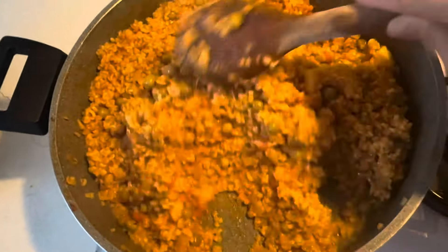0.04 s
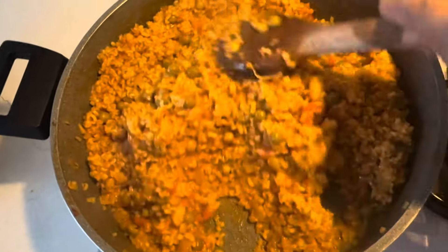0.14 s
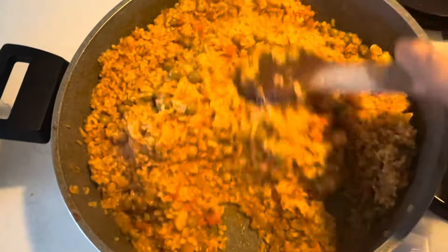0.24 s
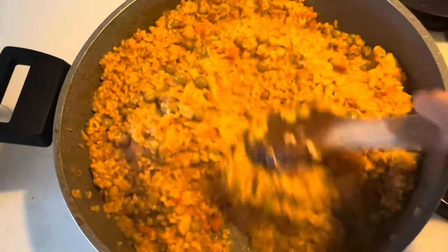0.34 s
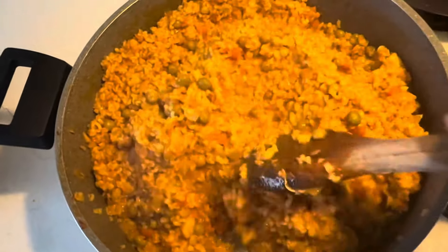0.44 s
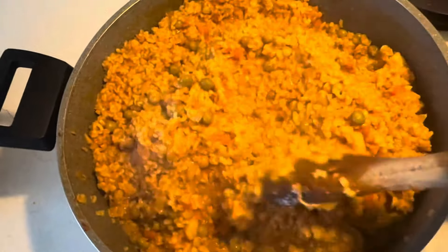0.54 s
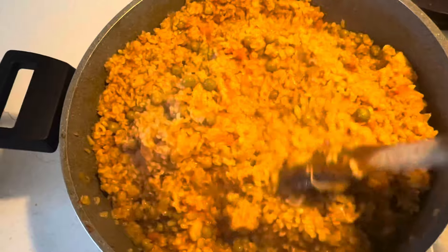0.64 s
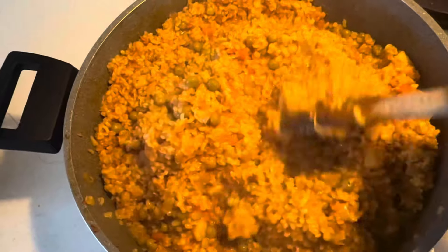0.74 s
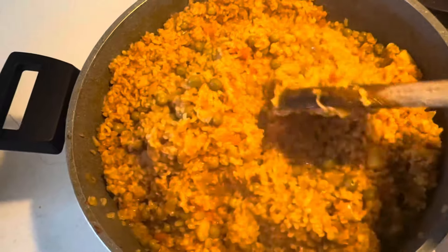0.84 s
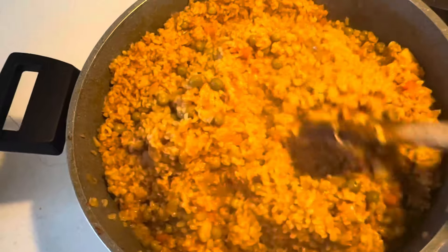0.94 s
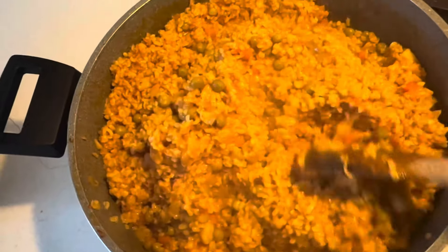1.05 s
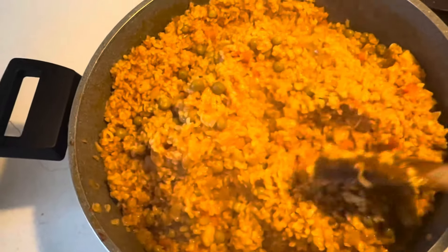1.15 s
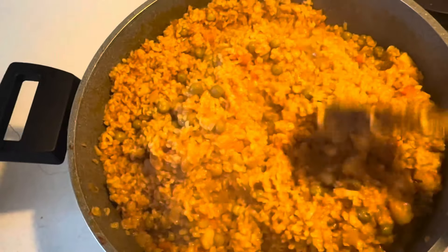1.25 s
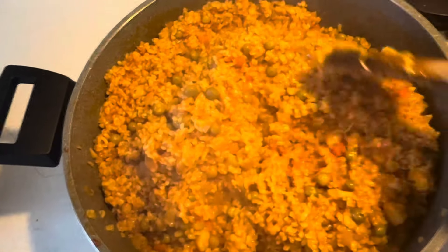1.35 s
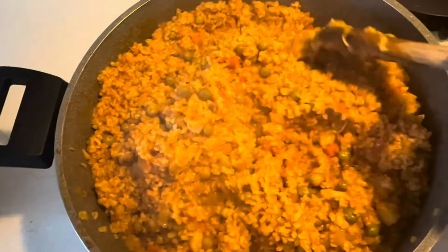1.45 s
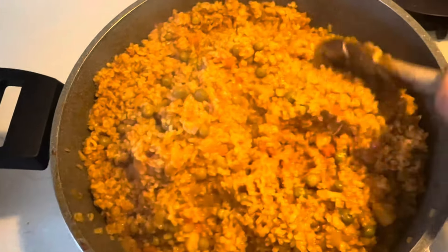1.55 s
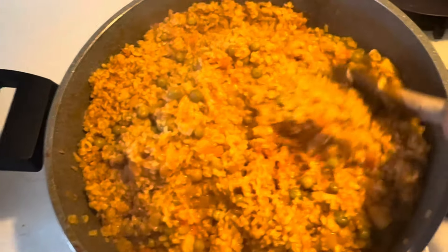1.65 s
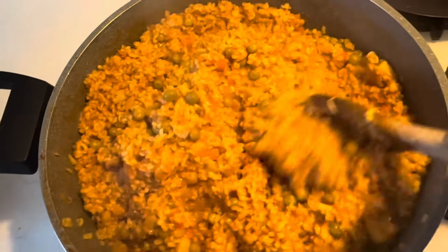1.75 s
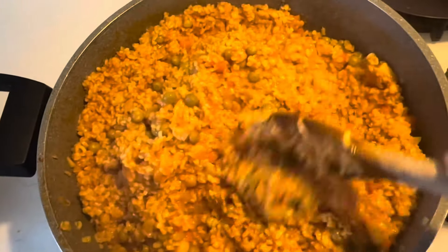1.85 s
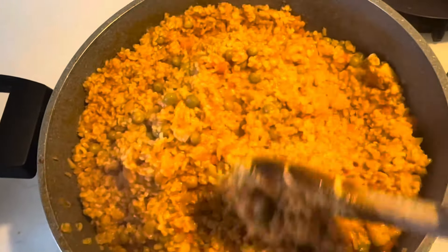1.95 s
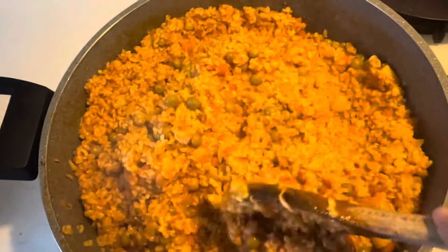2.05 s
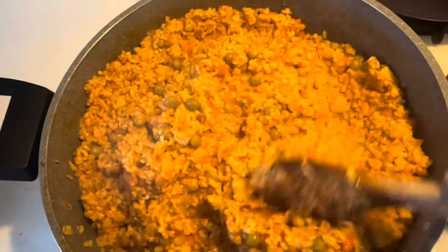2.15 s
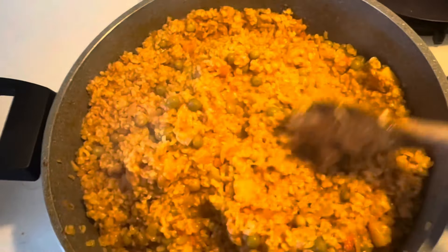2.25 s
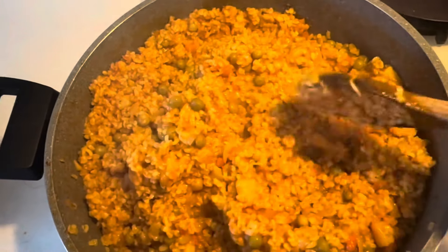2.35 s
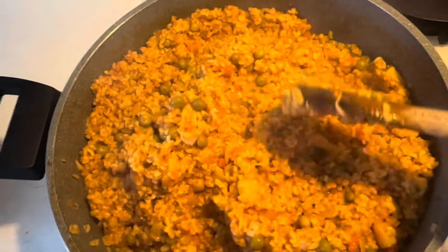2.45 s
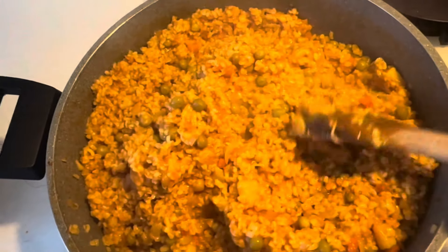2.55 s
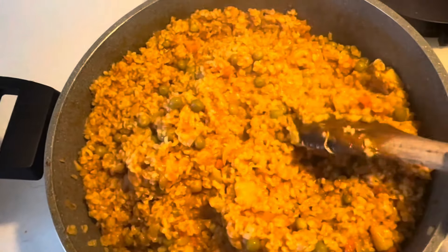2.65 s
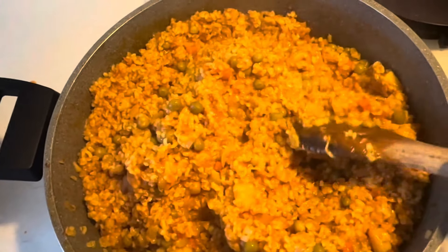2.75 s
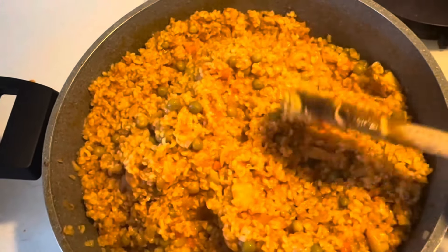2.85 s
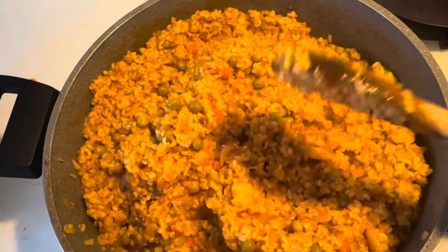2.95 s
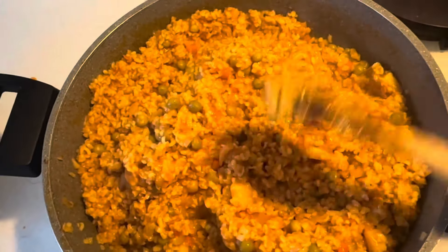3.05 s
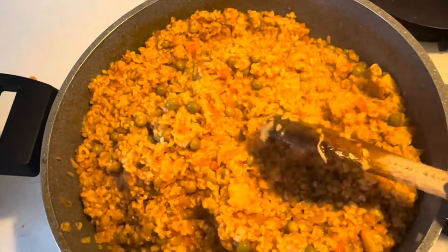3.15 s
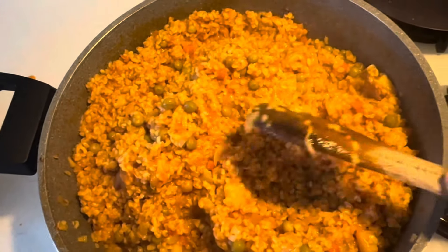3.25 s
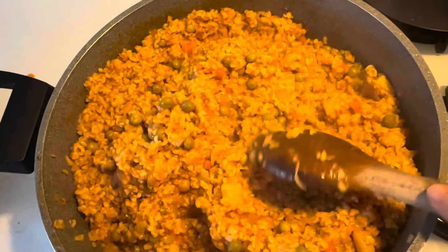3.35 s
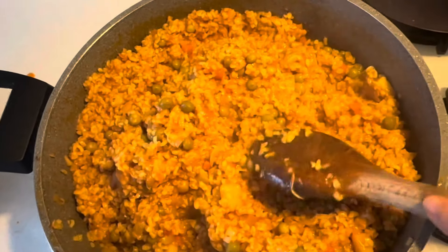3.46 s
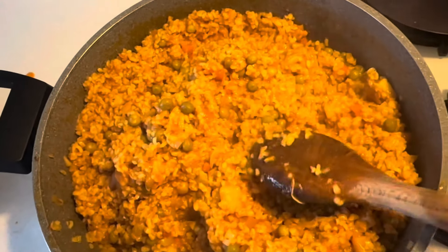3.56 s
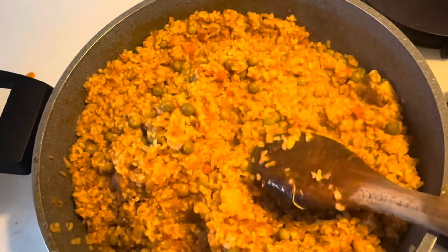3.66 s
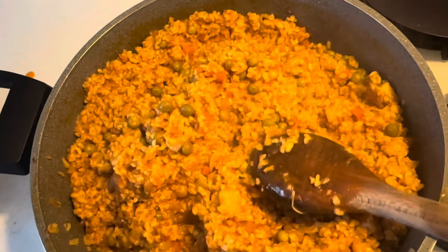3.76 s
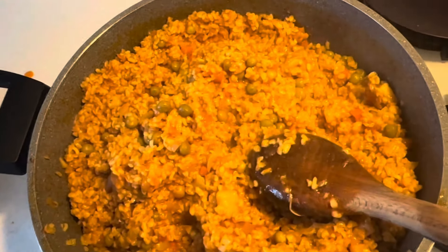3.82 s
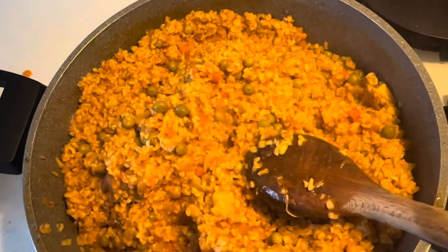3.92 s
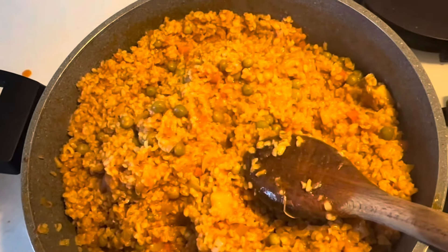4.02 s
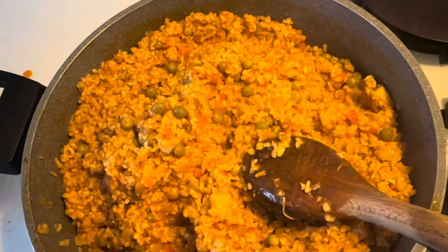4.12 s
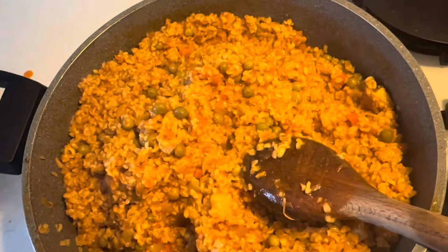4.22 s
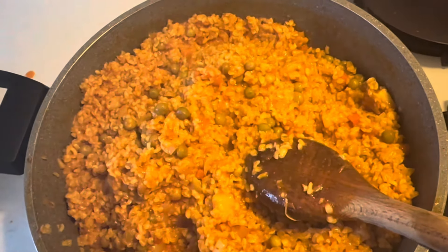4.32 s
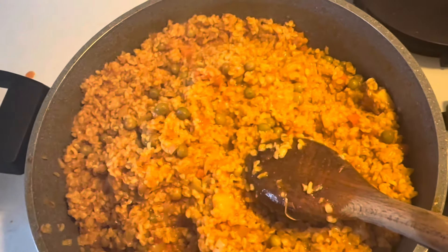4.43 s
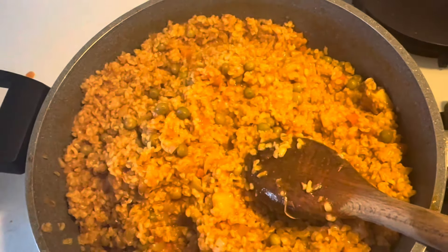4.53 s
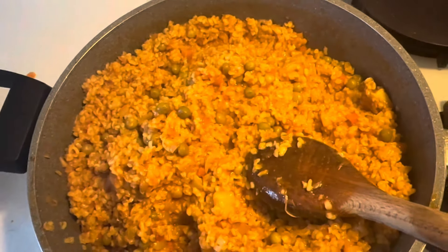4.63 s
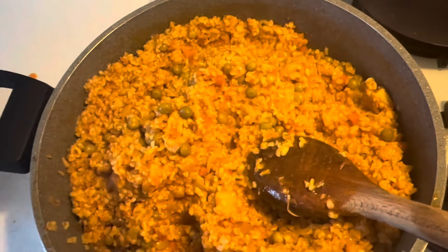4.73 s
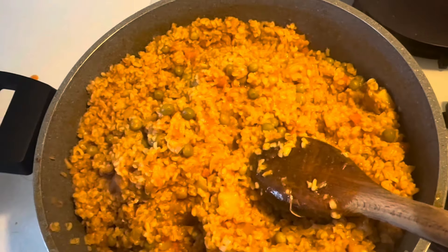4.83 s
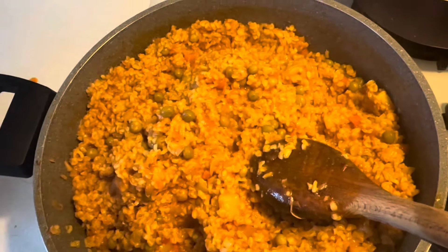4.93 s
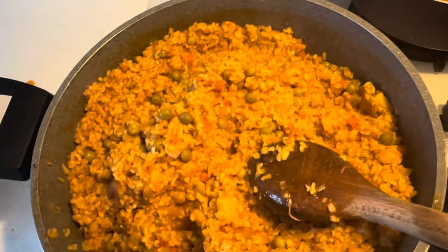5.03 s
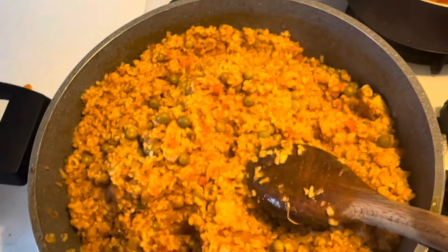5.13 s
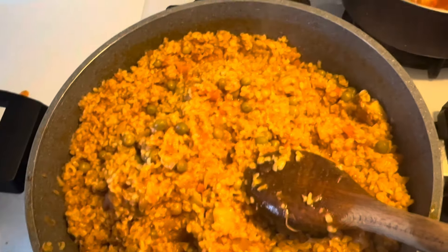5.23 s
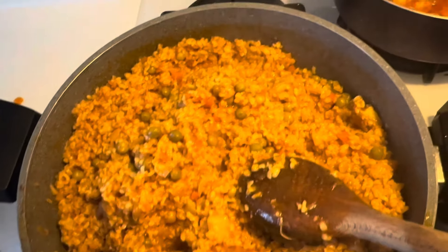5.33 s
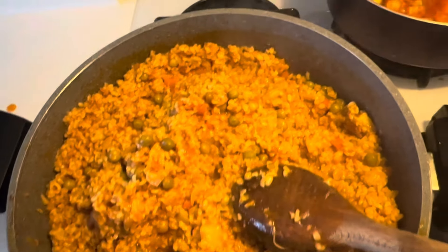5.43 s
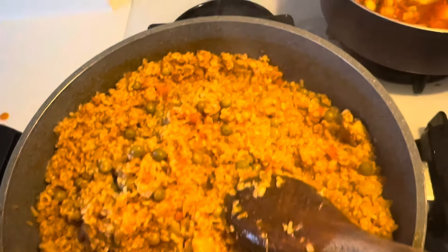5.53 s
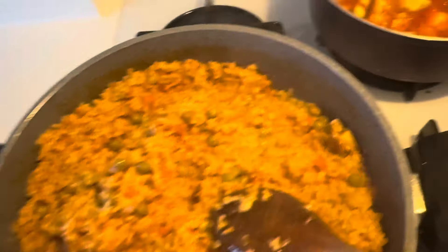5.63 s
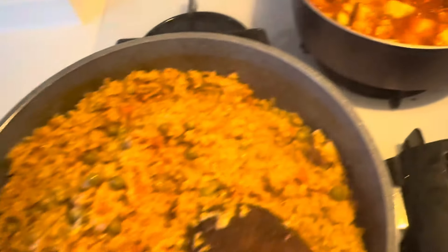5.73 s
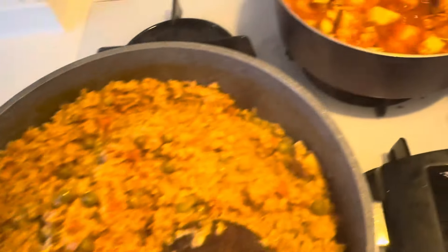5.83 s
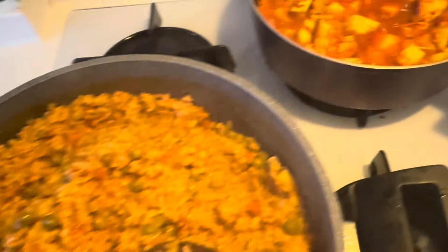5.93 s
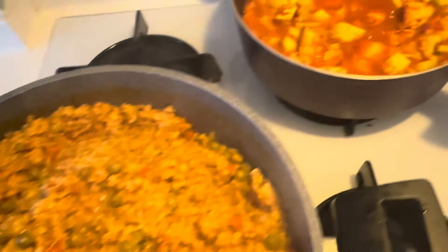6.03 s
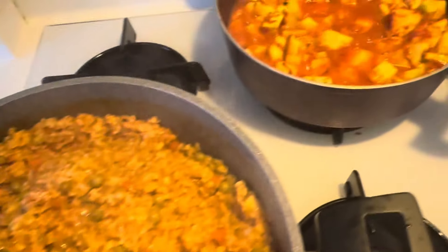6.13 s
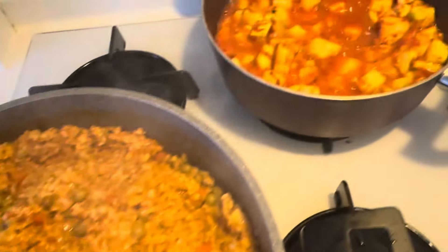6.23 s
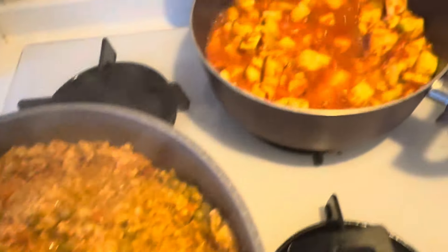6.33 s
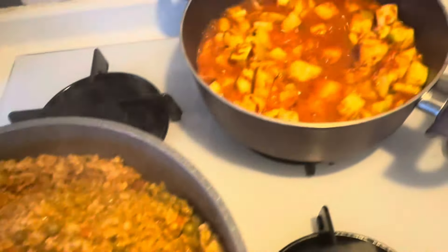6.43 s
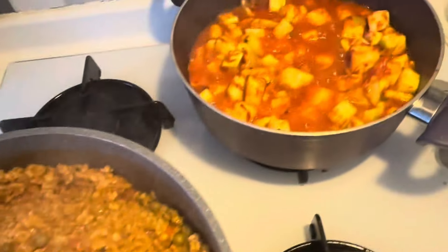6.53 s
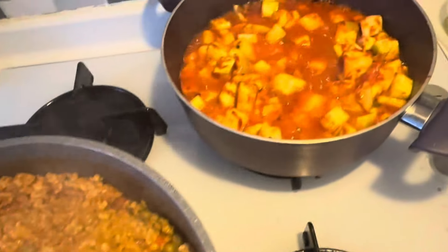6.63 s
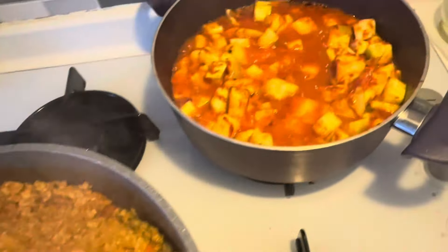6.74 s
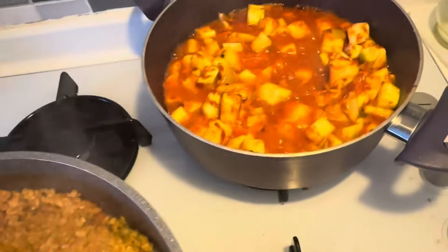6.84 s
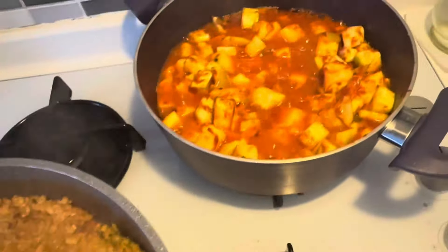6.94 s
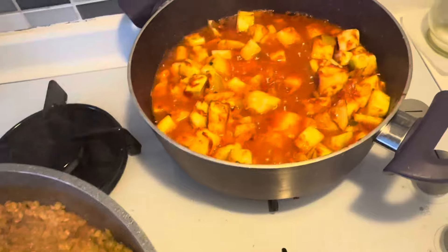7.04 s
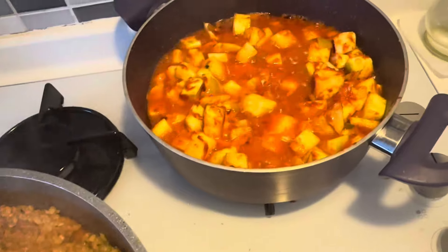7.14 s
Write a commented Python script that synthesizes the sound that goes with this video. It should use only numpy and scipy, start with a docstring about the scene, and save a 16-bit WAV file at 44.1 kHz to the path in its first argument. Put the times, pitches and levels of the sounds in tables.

```python
"""Gas burners rumble and rice sizzles faintly while a wooden spoon softly turns it; stew bubbles in a pot beside it.
The spoon bumps the pan, raps once hard on its rim and is laid down; the pan thuds and chatters on its grate.
Shaped noise makes flames, seething and scraping; decaying sines make bubbles, crackle and struck modes.
The steady sources grow louder, the stew's pips most, as the microphone moves from the rice to the pot."""
import sys
import numpy as np
from scipy import signal
from scipy.fft import rfft, irfft, next_fast_len
from scipy.io import wavfile
from scipy.ndimage import map_coordinates

SR = 44100
rng = np.random.default_rng(int(sys.argv[2]) if len(sys.argv) > 2 else 0)


def transcribe(u):
    """Save the signal u as a 16-bit wav file named by the first command-line argument.

    u: samples, shape (n,) or (channels, n), limited to [-1, 1]; the rate is SR.
    q: integer samples, one column per channel.
    """
    v = np.clip(np.atleast_2d(u).T, -1, 1)
    q = np.round(v * 32767).astype(np.int16)
    wavfile.write(sys.argv[1], SR, q)


N = 316638  # length [samples]


def amp(db):
    """Decibels to amplitude gain, 20 dB for each factor of ten."""
    return 10 ** (np.asarray(db) / 20)


def unit(x):
    """Normalise the mean power, so that the rms is 1."""
    return x / np.sqrt(np.mean(x ** 2) + 1e-20)


def along(points, hz):
    """Interpolate (frequency [Hz], value) points on a logarithmic frequency axis."""
    f, v = np.transpose(points)
    return np.interp(np.log(hz + 1), np.log(f + 1), v)


def wobble(rate):
    """Slow random modulation: a smooth curve through rate random knots a second."""
    knots = rng.standard_normal(int(N * rate / SR) + 4)
    return map_coordinates(knots, [np.arange(N) * rate / SR])


def swell(s, half):
    """A Gaussian envelope: a smooth rise and fall around time s [s]."""
    return np.exp(-((np.arange(N) / SR - s) / half) ** 2)


def add(track, s, sound):
    """Superposition: mix a sound into a track at time s [s]."""
    start = round(s * SR)
    part = sound[..., :track.shape[-1] - start]
    track[..., start:start + part.shape[-1]] += part


def filtered(x, response):
    """Linear filtering: multiply the spectrum by a complex response of frequency."""
    n = x.shape[-1]
    m = next_fast_len(n + SR // 4)
    return irfft(rfft(x, m) * response(np.fft.rfftfreq(m, 1 / SR)), m)[..., :n]


def spread(pair, spectrum):
    """Interchannel coherence: mix two unrelated signals into coloured stereo of rms 1, near mono in the bass."""
    # likeness of left and right: (frequency [Hz], coherence [0 to 1])
    coherence = [(60, 1), (130, .97), (290, 0.9), (640, 0.72), (1400, 0.26), (2400, 0.62), (4400, 0.37),
                 (8000, 0.13), (15000, 0.4)]

    def mid_and_side(hz):
        turn = np.arccos(np.clip(along(coherence, hz), -1, 1)) / 2
        return amp(along(spectrum, hz)) * [np.cos(turn), np.sin(turn)]

    mid, side = filtered(pair, mid_and_side)
    return unit(np.array([mid + side, mid - side]))


def ring(modes, t, vary_db):
    """Modal synthesis: a sum of exponentially damped sines whose strengths scatter by vary_db."""
    return sum(
        amp(db + vary_db * rng.normal() - 60 * t / t60) * np.sin(2 * np.pi * hz * t)
        for hz, db, t60 in modes)


def bubble(t, hz, cycles, rise):
    """A bubble as damped oscillator: it dies by 60 dB in some cycles, its pitch rising as it opens."""
    age = t * hz / cycles
    tone = np.sin(2 * np.pi * hz * t * (1 + rise * np.minimum(age, 1)))
    onset = 1 - np.exp(-2 * t * hz)
    return tone * amp(-60 * age) * onset


def grains(rate, hz, scatter, cycles, size_db):
    """Granular noise: two unrelated streams of tiny bursts with random pitch and size, rms 1."""
    count = int(rate * N / SR)  # both streams together
    when, size, side = rng.random((count, 3)).T
    pitch = np.clip(hz * np.exp(scatter * rng.standard_normal(count)), hz / 4, SR / 3)
    t = np.arange(int(min(2 * cycles / hz, .05) * SR)) / SR
    # exponentially distributed sizes in dB, capped at five times the mean
    gain = amp(size_db * np.minimum(-np.log(1 - size), 5))
    shapes = bubble(t, pitch[:, None], cycles, rise=.1) * gain[:, None]
    # the second stream lies N samples after the first
    where = (when * (N - len(t))).astype(int) + N * (side > .5)
    samples = (where[:, None] + np.arange(len(t))).ravel()
    return unit(np.bincount(samples, shapes.ravel(), 2 * N).reshape(2, N))


def kitchen(x, wet_db):
    """Reverberation: a sound with the small room's decaying diffuse answer, whose treble dies first."""
    # room decay: (frequency [Hz], t60 [s])
    echo = [(100, 0.43), (1000, 0.4), (5000, 0.36), (15000, 0.067)]
    # room colour: (frequency [Hz], gain [dB])
    room_colour = [(60, -17), (200, 1.5), (400, -7), (700, -3.5), (1500, -3.5), (5000, -4), (15000, -4)]
    hz, t, z = signal.stft(rng.standard_normal((2, SR // 2)), SR, nperseg=256)
    decay = amp(-60 * t / along(echo, hz)[:, None])
    build_up = 1 - np.exp(-t / 0.005)
    tail = signal.istft(z * decay * build_up, SR, nperseg=256)[1]
    tail = spread(tail, room_colour) / np.sqrt(tail.shape[1])
    wet = signal.fftconvolve(np.atleast_2d(x), tail, axes=1)[:, :x.shape[-1]]
    return x + amp(wet_db) * wet


def walls(pair, echo_db, count=10):
    """Early reflections: pan sides, stove top and back wall send weak copies to each channel."""
    delay = rng.uniform(.001, .02, (2, count))  # s
    polarity = rng.choice([-1, 1], (2, count))
    paths = np.zeros((2, SR // 40))
    paths[np.arange(2)[:, None], (delay * SR).astype(int)] = amp(echo_db) * polarity
    paths[:, 0] = 1  # direct sound
    return unit(signal.fftconvolve(pair, paths, axes=1)[:, :N])


def nearness():
    """Source distance: the microphone's way from rice to pot, 0 to 1, easing in and out."""
    move_start_s, move_s = 5.44, 1.35
    progress = np.clip((np.arange(N) / SR - move_start_s) / move_s, 0, 1)
    return np.sin(np.pi / 2 * progress) ** 2


def heard(level_db):
    """Level against distance: gain of a steady source as the microphone moves."""
    over_rice, rise = level_db
    return amp(over_rice + rise * nearness())


def burners():
    """Combustion noise: gas flames rumble under the pans as slowly wavering low noise."""
    # flame spectrum: (frequency [Hz], gain [dB])
    flame = [(20, -27), (33, -15), (48, -12.5), (65, 4), (86, -7.5), (113, -3.5), (150, -12.5),
             (185, -20.5), (230, -20.5), (255, -12.5), (325, -12), (440, -22), (700, -19.5), (2000, -70)]
    return spread(rng.standard_normal((2, N)), flame) * amp(.6 * wobble(7))


def simmer():
    """Boiling noise: water seethes deep in the food, coloured by the hollow of the pans."""
    # seething spectrum: (frequency [Hz], gain [dB])
    stew = [(250, -25), (480, -7.5), (610, 1.5), (690, -11.5), (790, 6), (890, -4.5), (1010, 4.5),
            (1120, -1), (1440, 4.5), (1720, -10), (2000, -1.5), (2900, -11.5), (6000, -20.5)]
    bubbles = grains(rate=900, hz=1300, scatter=.5, cycles=12, size_db=2)
    seethe = rng.standard_normal((2, N)) + amp(-15) * bubbles
    return spread(seethe, stew) * amp(.4 * wobble(12))


def lesser_plops(count=60):
    """Random arrivals: bubbles (time [s], level [dB], pitch [Hz]), a greater share audible near the pot."""
    typical_db, scatter_db = -41.5, 1
    typical_hz, scatter_octaves = 1550, .33
    share_far = .4  # share of the bubbles that carries as far as the rice pan
    when, luck = rng.random((count, 2)).T
    size, pitch = np.clip(rng.standard_normal((count, 2)).T, -2, 2)
    audible = luck < share_far + (1 - share_far) * nearness()[(when * N).astype(int)]
    level_db = typical_db + scatter_db * size
    hz = typical_hz * 2 ** (scatter_octaves * pitch)
    return np.transpose([when * N / SR, level_db, hz])[audible]


def plops():
    """Bubble resonance: now and then a larger bubble rings out above the seething."""
    # the largest single bubbles: (time [s], level [dB], pitch [Hz])
    largest = [(1.417, -33.5, 1455), (3.278, -36.5, 1480), (3.711, -40, 1370), (4.735, -35.5, 633),
               (4.741, -37.5, 795), (4.973, -39.5, 2910), (5.062, -39.5, 2130), (5.49, -35.5, 1440),
               (6.345, -37, 1390), (6.545, -35, 1405)]
    out, t = np.zeros(N), np.arange(SR // 10) / SR
    for s, db, hz in [*largest, *lesser_plops()]:
        add(out, s, amp(db) * bubble(t, hz, cycles=39, rise=0.015))
    return kitchen(out, wet_db=-10.0)


def stew_bubbles():
    """Overlapping bubble resonances: pips burst on top of the stew, swelling in short flurries."""
    # steady pips: (level over the rice [dB], gain on reaching the pot [dB])
    pips_db = (-60.5, 5.5)
    # the stew wells up: (middle [s], level [dB])
    upwellings = [(5.92, -50), (6.33, -52), (6.47, -53), (6.69, -55), (6.945, -49)]
    # pip spectrum: (frequency [Hz], gain [dB])
    pip_colour = [(500, -4), (1400, -1.5), (2200, -4), (3500, 1)]
    flurry_half_s = 0.023
    clusters = unit(amp(2 * wobble(11)))
    pips = grains(rate=650, hz=1600, scatter=.24, cycles=22, size_db=1.7)
    flurries = sum(amp(db) * swell(s, flurry_half_s) for s, db in upwellings)
    return (heard(pips_db) * clusters + flurries) * spread(pips, pip_colour)


def sizzle():
    """Explosive evaporation: water spits in the fat under the rice, fine crackle over a steam hiss."""
    # frying spectrum: (frequency [Hz], gain [dB])
    fat = [(900, -23), (2300, -3), (3300, 1.5), (3900, 2.5), (4300, 4.5), (4800, 1), (5600, -2), (6800, 0),
           (7700, -3.5), (8700, 0.5), (10000, -4), (13000, -18.5), (15800, -16)]
    crackle = grains(rate=1400, hz=9500, scatter=.28, cycles=6, size_db=2.6)
    clumps = amp(-5.0 + 1.8 * wobble(18))  # it spits in clumps
    fry = rng.standard_normal((2, N)) + clumps * crackle
    lean_left = amp([[.9], [-.9]])
    return spread(walls(fry, echo_db=-19), fat) * amp(0.84 * wobble(12)) * lean_left


def spoon_speed():
    """Friction noise follows speed: the spoon speeds up and slows down in each stroke."""
    # strokes through the rice: (middle [s], half length [s], level [dB])
    strokes = [(.1, 0.071, -57.5), (0.3, 0.13, -52), (.7, .07, -60), (.9, .05, -65), (1.62, 0.12, -55.5),
               (1.87, .1, -55.5), (2.192, 0.041, -56)]
    return sum(amp(db) * swell(s, half) for s, half, db in strokes)


def flare():
    """Exponential drying: gain of the sizzle as strokes turn wet rice onto hot metal, which then dries."""
    flare_db, drying_s = 1, 0.42  # most extra sizzle, drying time constant
    wet = signal.lfilter([1], [1, -np.exp(-1 / (drying_s * SR))], spoon_speed())
    return amp(flare_db * wet / wet.max())


def stirring():
    """Stick and release: moist grains part and stick again under each stroke of the spoon."""
    # colouring of the grains: (frequency [Hz], gain [dB])
    squish_colour = [(900, -14), (1700, -4), (3300, -1), (4300, -2), (6800, -2), (8700, 6), (13000, 7),
                     (15800, -9)]
    squish = grains(rate=4000, hz=6000, scatter=.75, cycles=3, size_db=2.3)
    return spoon_speed() * spread(squish, squish_colour)


def chatter(rough_db=1.5):
    """Stick-slip friction: the jolted pan skids on the iron grate in gritty bursts and the metal rings."""
    # skids on the grate: (time [s], level [dB], grit t60 [s], metal ring relative to the grit [dB])
    skids = [(2.5842, -34, 0.018, -31), (3.07, -15.5, 0.061, -20), (3.076, -17, 0.11, -6.5),
             (3.0954, -12, 0.017, -30), (3.3322, -39, .02, -32), (3.36, -37, .025, -29)]
    # grit spectrum: (frequency [Hz], gain [dB])
    clack = [(150, -22), (400, 9.5), (800, 10.5), (1450, 4), (1900, 2), (3000, -1), (5000, -1.5),
             (7500, -4), (9000, -2.5), (13000, -12), (15800, -20)]
    # modes of metal on metal: (frequency [Hz], level [dB], t60 [s])
    metal = [(2980, -6.5, 0.1), (5230, -13, .14), (8500, -17, 0.18), (8807, -7, 0.21), (9070, -10, .16),
             (13221, -11, 0.11), (14404, -9, 0.29)]
    out, t = np.zeros((2, N)), np.arange(SR // 2) / SR
    catches = unit(amp(rough_db * wobble(350)))  # the iron catches and slips unevenly
    for s, db, t60, metal_db in skids:
        envelope = amp(-60 * t / t60) * (1 - np.exp(-t / 0.0012))
        grit = spread(rng.standard_normal((2, len(t))), clack) * envelope
        grit = grit * catches[round(s * SR):][:len(t)]
        metal_ring = amp(metal_db) * ring(metal, t, vary_db=.5)
        add(out, s, amp(db) * (kitchen(grit, wet_db=-14.5) + metal_ring))
    return out


def knocks(bend=0.1655, ring_db=0, fastest_hz=2500, wood_t60=0.037, lag=0.00016, contact_cycles=3):
    """Dispersion of bending waves in pan and stove top: treble arrives first, bass last, and modes ring."""
    # spoon against pan: (time [s], level [dB], contact softness corner [Hz], wood pitch [Hz], wood level [dB])
    blows = [(2.558, -27, 562, 2060, -11), (2.5825, -32, 1500, 3020, -13), (3.0678, -4.5, 3020, 1427, -25),
             (3.3321, -22, 1105, 990, -3.5)]
    # modes of the pan on the stove top: (frequency [Hz], level [dB], t60 [s])
    pan = [(48.6, -39, .22), (68.3, -18, 0.43), (99, -22, 0.085), (120, -1, 0.18), (162.4, -19.5, 0.34),
           (262.3, -15.5, 0.29), (348, -30, 0.21), (356, -16.5, 0.15), (396, -15.5, 0.1),
           (467, -18.5, 0.097), (583, -28.5, 0.3), (615.4, -25, 0.29), (741, -25.5, 0.14),
           (924, -23.5, 0.18), (1070, -17.5, 0.09), (1140, -31, .15), (1330, -22, 0.11), (1457, -17, 0.1),
           (1627, -23, 0.14)]
    # spectrum of the push: (frequency [Hz], gain [dB])
    thud = [(25, -44), (60, -18), (130, -14), (200, -7.5), (280, -3), (380, 0), (480, -4), (650, -14),
            (1100, -16), (1500, -11.5), (2200, -24), (5000, -65)]
    # channel balance: (frequency [Hz], left minus right [dB])
    balance = [(100, -0.5), (330, -5), (700, 6), (1300, -6), (2400, 15)]
    out, t = np.zeros((2, N)), np.arange(SR) / SR
    lead = SR // 50  # samples of room ahead of the blow

    def travel(hz):
        # delay = bend / sqrt(frequency), counted from that at fastest_hz; bend in s sqrt(Hz)
        return np.exp(-2j * np.pi * bend * (2 * np.sqrt(hz) - hz / np.sqrt(fastest_hz)))

    def channels(hz):
        # the blows land on the right, so they reach the left lag seconds later
        difference = np.log(amp(along(balance, hz))) - 2j * np.pi * hz * lag
        return np.exp(np.outer([.5, -.5], difference))

    push = filtered(signal.unit_impulse(SR, lead), lambda hz: amp(along(thud, hz)) * travel(hz))
    push = push / abs(push).max()
    for s, db, soft_hz, wood_hz, wood_db in blows:
        modes = filtered(np.pad(ring(pan, t, vary_db=0.0), (lead, 0))[:SR], travel)
        # a soft contact lasts longer and so drives less treble
        blow = filtered(push + amp(ring_db) * modes, lambda hz: 1 / np.sqrt(1 + (hz / soft_hz) ** 4))
        # the spoon itself clacks, at a pitch set by the grip, later after a softer contact
        wood = ring([(wood_hz, wood_db, wood_t60)], t, vary_db=1.0) * (1 - np.exp(-t / 0.0015))
        add(blow, lead / SR + contact_cycles / soft_hz, wood)
        add(out, s - lead / SR, amp(db) * kitchen(filtered(blow, channels), wet_db=-16.0))
    return out


def scene():
    """Superposition of the steady cooking and the spoon's work."""
    # steady sources: (level over the rice [dB], gain on reaching the pot [dB])
    burner_db = (-48, 1.5)
    simmer_db = (-51, 1.3)
    sizzle_db = (-54.5, 2)
    cooking = heard(burner_db) * burners() + heard(simmer_db) * simmer()
    cooking = cooking + heard(sizzle_db) * flare() * sizzle()
    return cooking + stew_bubbles() + plops() + stirring() + knocks() + chatter()


def record(dry, low_hz=43, order=6):
    """Band limiting: deep bass falls away, the treble dips near 11 kHz and nothing is left above top_hz."""
    # treble response: (frequency [Hz], gain [dB])
    treble = [(9800, 0.5), (10400, -7), (10900, -75), (12000, -19.5), (12700, 4.5), (13600, 5)]
    top_hz = 15800
    lean = signal.sosfilt(signal.butter(order, low_hz, "highpass", fs=SR, output="sos"), dry)
    return filtered(lean, lambda hz: amp(along(treble, hz)) * (hz < top_hz))


dry = scene()
out = record(dry)
transcribe(out)
```